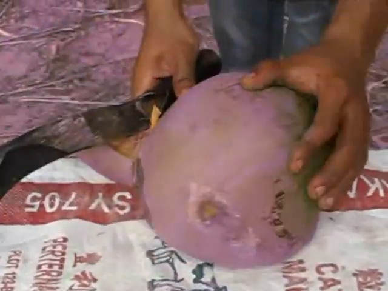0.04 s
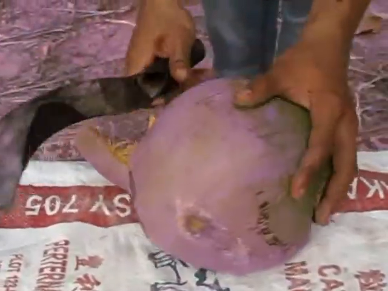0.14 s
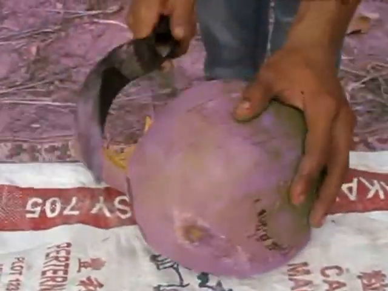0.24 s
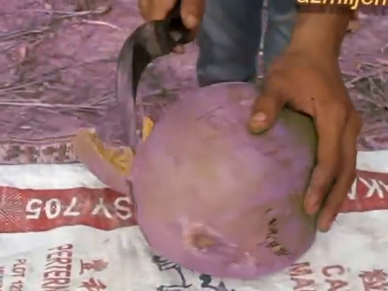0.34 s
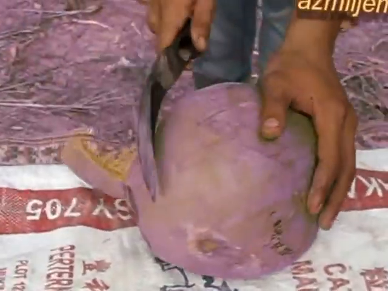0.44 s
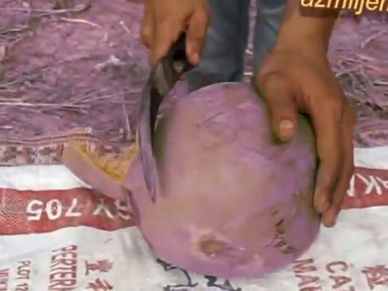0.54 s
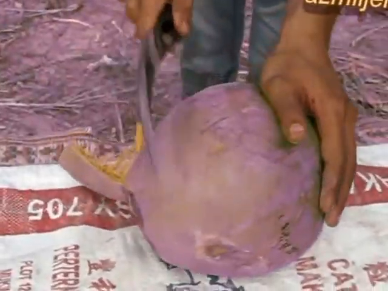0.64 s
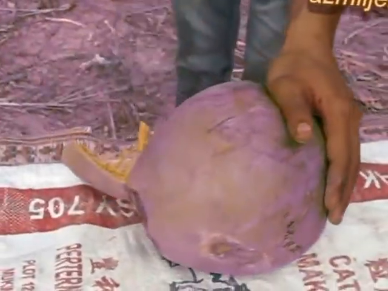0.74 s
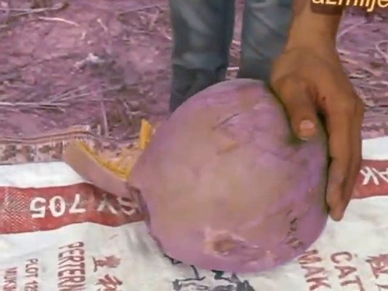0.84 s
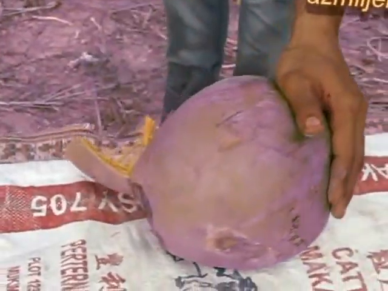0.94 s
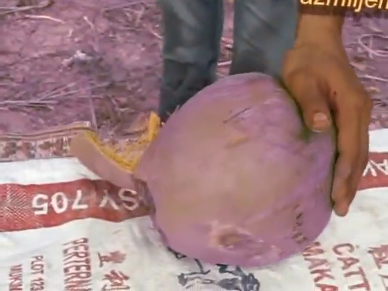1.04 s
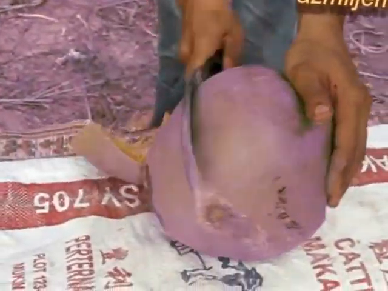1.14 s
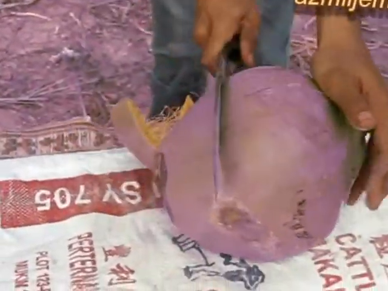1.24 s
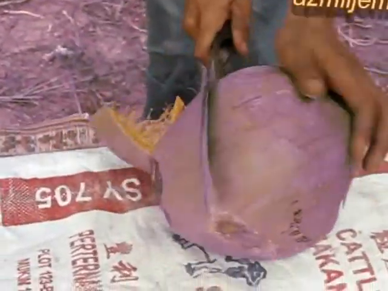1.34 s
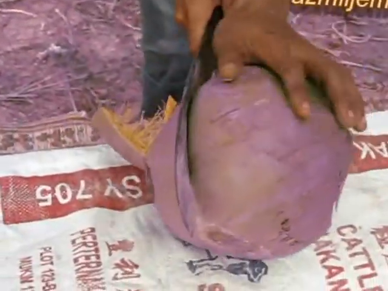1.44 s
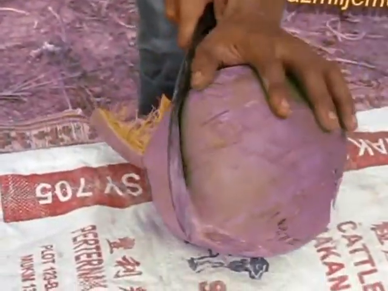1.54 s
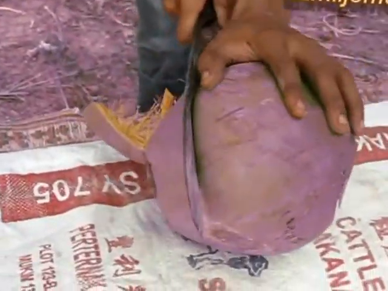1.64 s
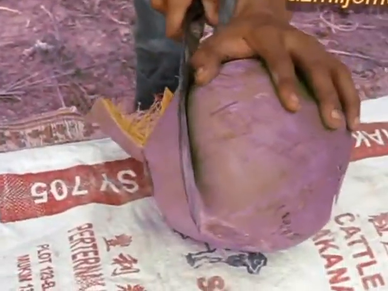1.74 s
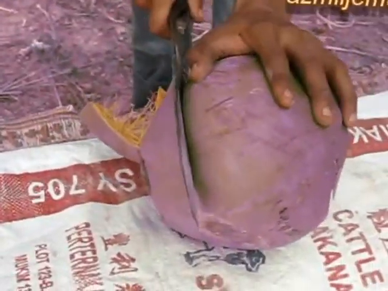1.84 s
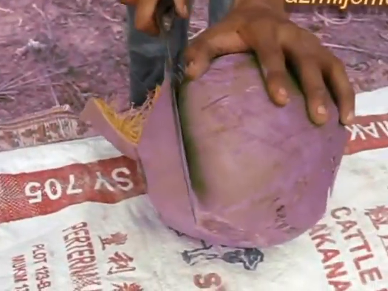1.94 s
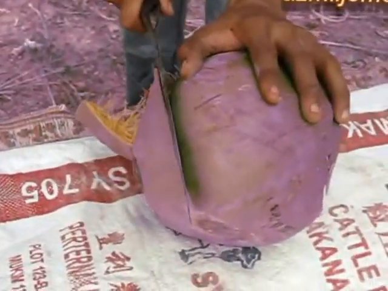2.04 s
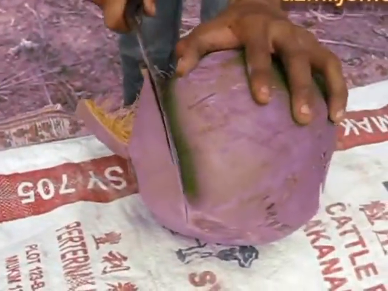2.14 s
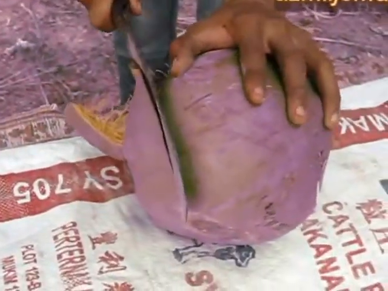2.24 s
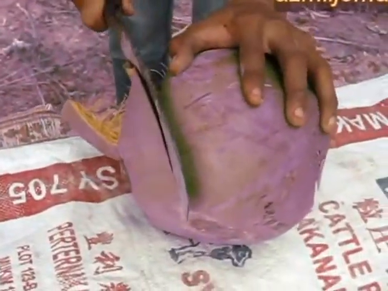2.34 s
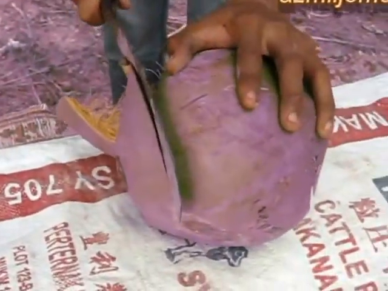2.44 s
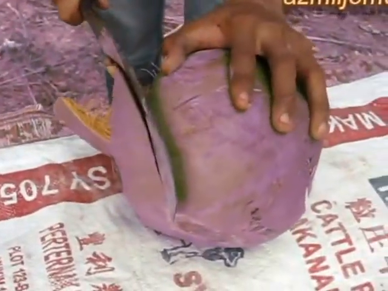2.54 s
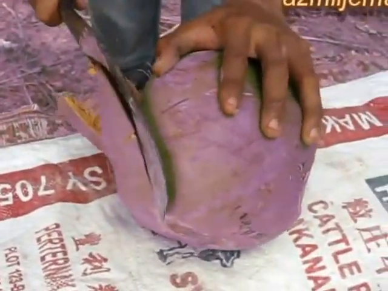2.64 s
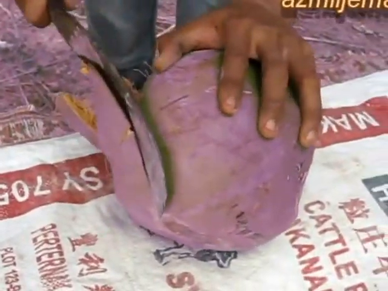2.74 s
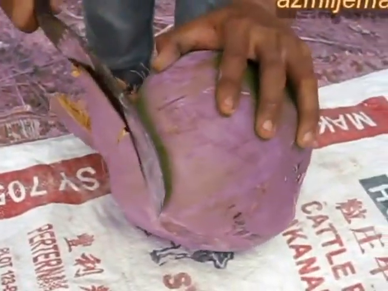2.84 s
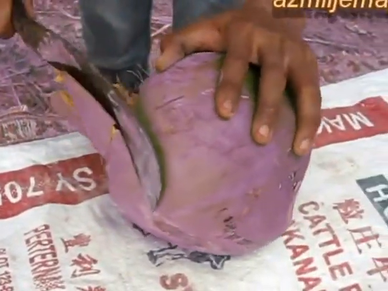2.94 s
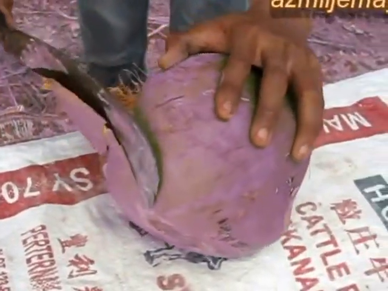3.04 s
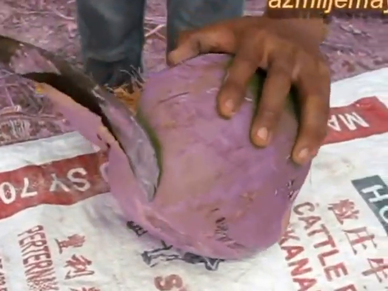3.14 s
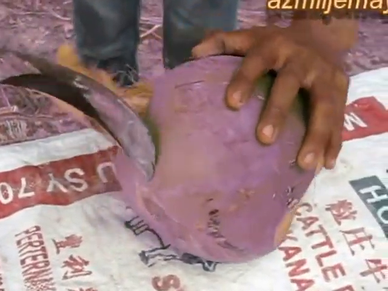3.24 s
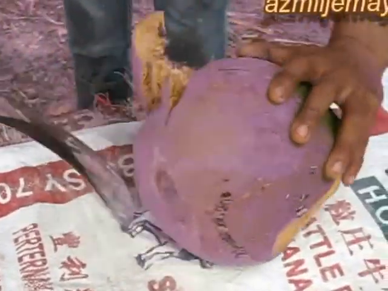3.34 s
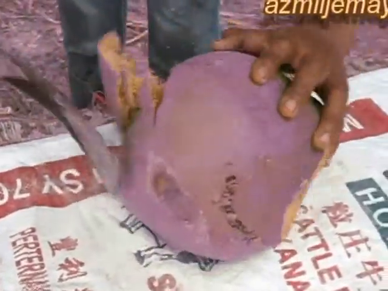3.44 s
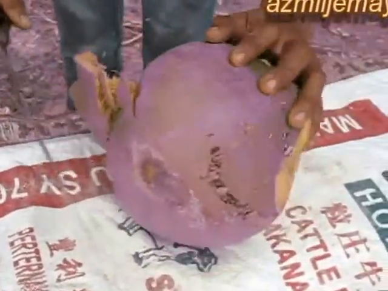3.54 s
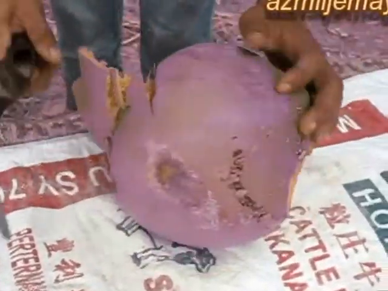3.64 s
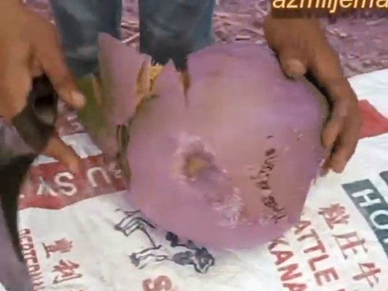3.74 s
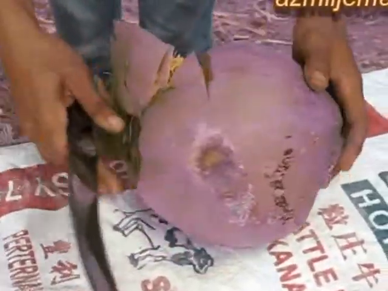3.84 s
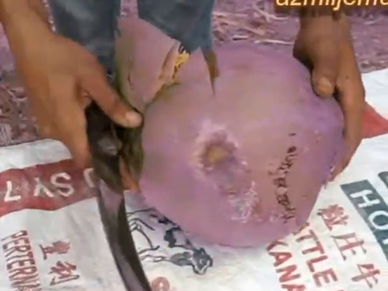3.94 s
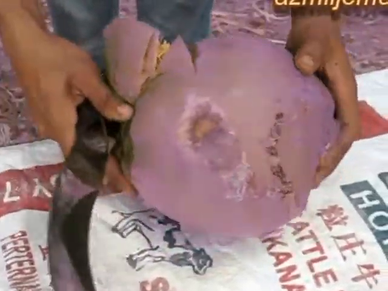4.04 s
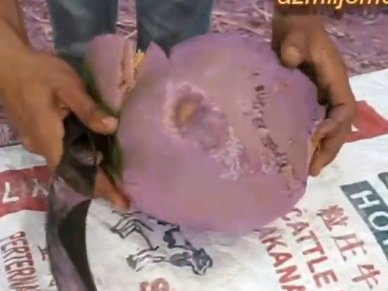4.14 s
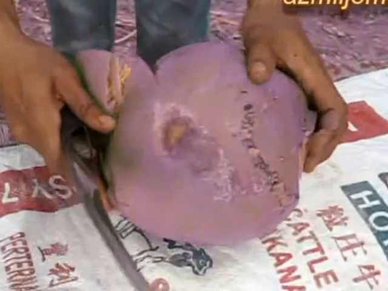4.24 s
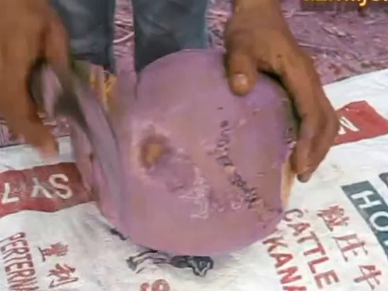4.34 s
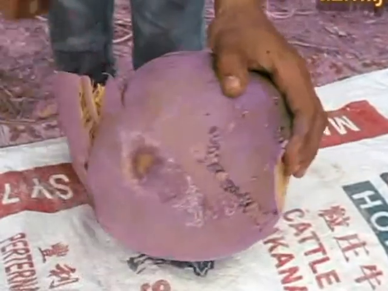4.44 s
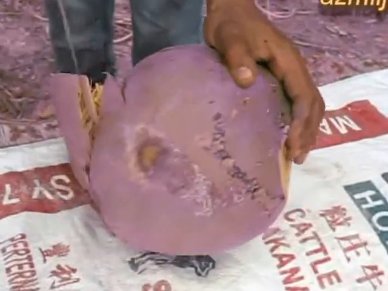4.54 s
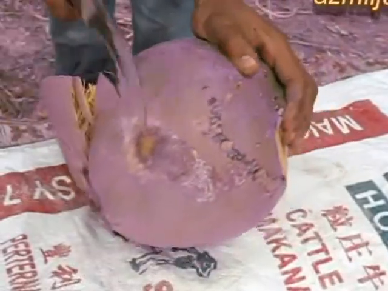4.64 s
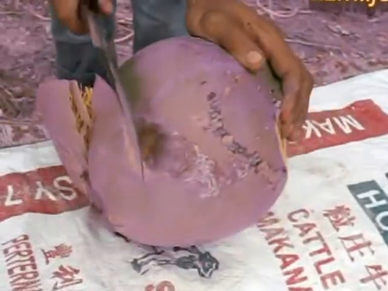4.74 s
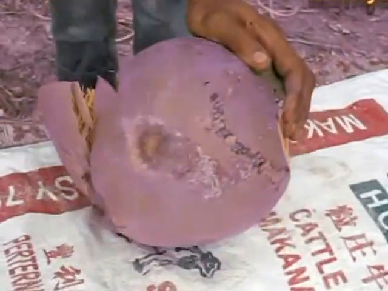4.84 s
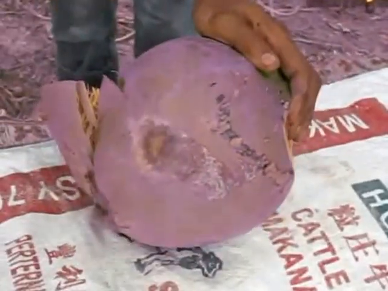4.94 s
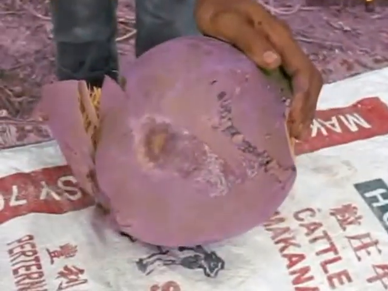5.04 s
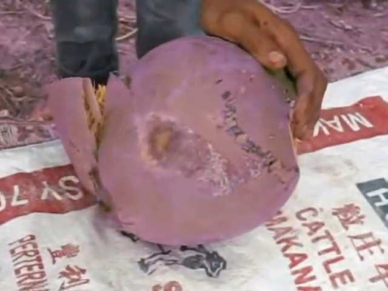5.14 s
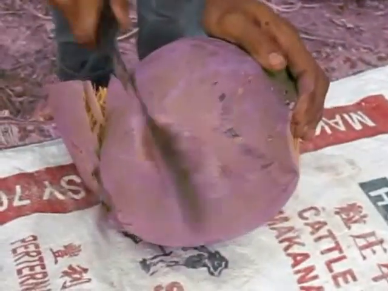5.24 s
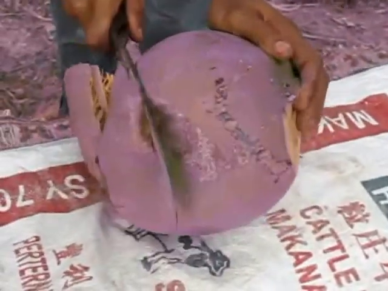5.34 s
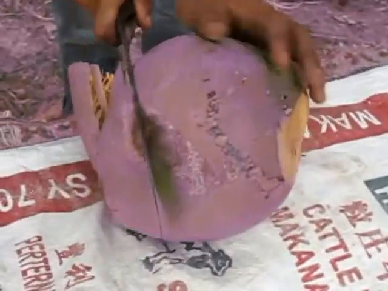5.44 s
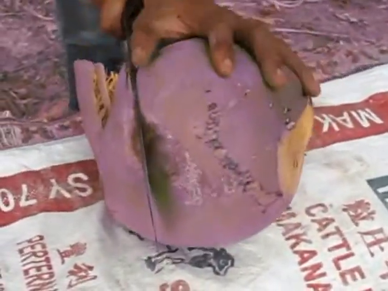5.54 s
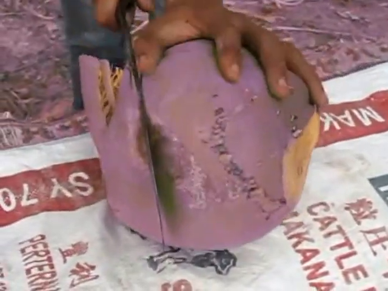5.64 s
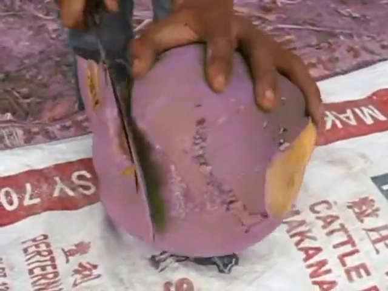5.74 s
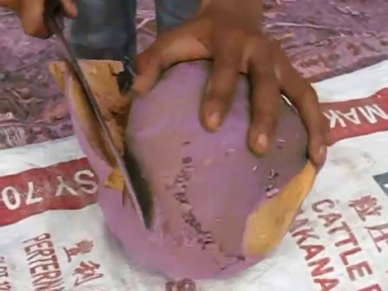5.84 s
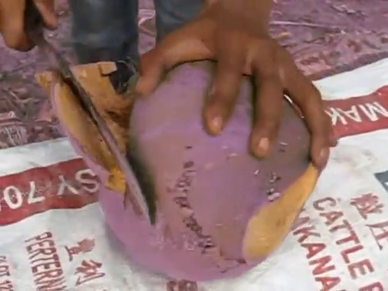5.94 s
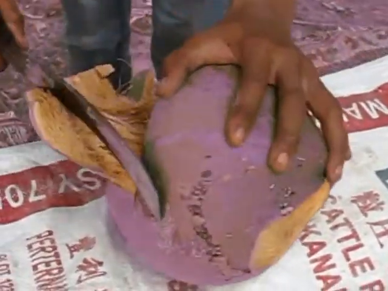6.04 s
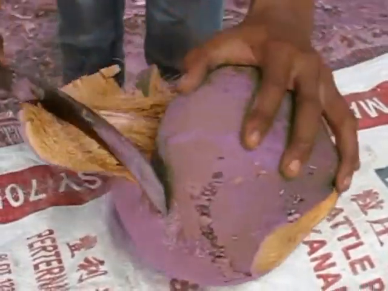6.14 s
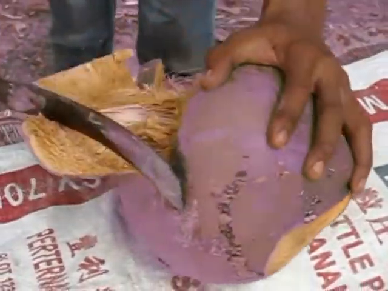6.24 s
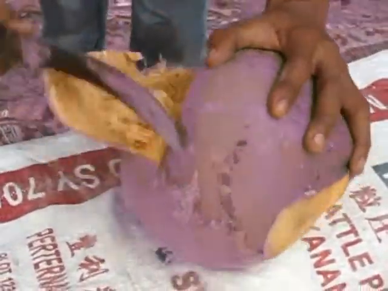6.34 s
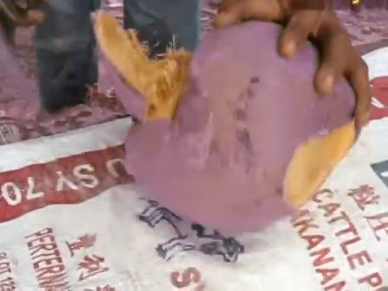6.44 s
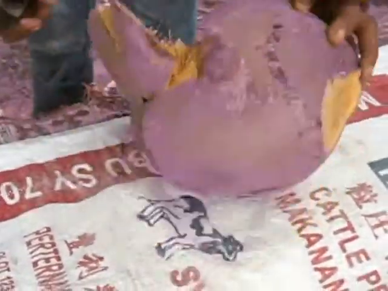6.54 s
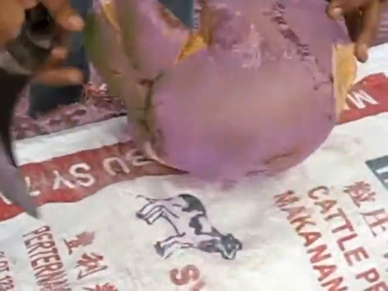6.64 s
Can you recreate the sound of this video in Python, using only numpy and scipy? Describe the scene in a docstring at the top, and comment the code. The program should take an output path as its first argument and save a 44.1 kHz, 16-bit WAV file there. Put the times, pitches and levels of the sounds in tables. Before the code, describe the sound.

Sharp hard chops into a green coconut, then rasping, crackling rips as the husk is levered loose, close up over steady high insect trills.

```python
"""Outdoors, a machete chops twice into a green coconut that lies on a woven plastic sack.
Chops knock the decaying modes of the nut, with a burst of cutting hiss and an echo from the yard.
The blade then levers the husk: clumped noise tears, clicks snap, and once a whole strip breaks loose.
Hands bump, tap and slide the nut; insects trill as narrow noise bands and chirp as short tones.
The close microphone overloads and ducks on the blows."""
import sys
import numpy as np
from scipy import signal
from scipy.fft import rfft, irfft, next_fast_len
from scipy.io import wavfile

SR = 44100
rng = np.random.default_rng(int(sys.argv[2]) if len(sys.argv) > 2 else 0)


def master(y):
    """Save y as 16-bit WAV."""
    cut = np.clip(np.atleast_2d(y).T, -1, 1)
    pcm = np.round(cut * 32767)  # scale
    wavfile.write(sys.argv[1], SR, pcm.astype(np.int16))


N = 295464
T = np.arange(N) / SR


def amp(db):
    """Decibels to gain."""
    return 10 ** (np.asarray(db) / 20)


def evened(x):
    """Scales to rms 1."""
    return x / np.sqrt(np.mean(x ** 2) + 1e-20)


def add(mix, start_s, sound):
    """Mixes a sound in at start_s, or at 0 if that is negative."""
    part = mix[max(round(start_s * SR), 0):][:len(sound)]
    part += sound[:len(part)]


def colour(x, points):
    """Causal minimum-phase filter of unit energy, shaped by (freq_hz, level_db) points."""
    hz, db = np.transpose(points)
    f = abs(np.fft.fftfreq(2048, 1 / SR))
    log_gain = np.log(amp(np.interp(np.log(f + 1), np.log(hz + 1), db)))
    min_phase = np.exp(np.conj(signal.hilbert(log_gain)))
    taps = np.fft.ifft(min_phase).real[:len(f) // 2]
    return signal.oaconvolve(x, taps / np.linalg.norm(taps))[:len(x)]


def band(x, lo_hz, hi_hz, order=2):
    """Butterworth band-pass."""
    sos = signal.butter(order, [lo_hz, min(hi_hz, SR / 2 - 1)], "band", fs=SR, output="sos")
    return signal.sosfilt(sos, x)


def resonate(x, hz, width_hz):
    """One resonance of peak gain 1."""
    return signal.lfilter(*signal.iirpeak(hz, hz / width_hz, fs=SR), x)


def drift(knots_per_s):
    """Random wander: straight lines between normal random knots."""
    knots = rng.standard_normal(4096)
    return np.interp(T * knots_per_s, np.arange(len(knots)), knots)


def crackle(per_s, spread_db):
    """Random clicks, many small and a few large, at rms 1."""
    size = amp(spread_db * np.minimum(rng.exponential(1, N), 4.5))
    sign = rng.choice([-1, 1], N)
    return evened(size * sign * (rng.random(N) < per_s / SR))


# blows and jolts of the nut: [start_s, level_db, knock_decay_s, hardness_db_per_octave,
# cutting_hiss_db, lasting_ring_db, yard_echo_db]
BLOWS = [(0.5207, -16.5, 0.0044, 0, -22, -17, -21), (1.1869, 8, 0.0017, 9, -12.5, -20, -16),
         (2.897, -23.5, .002, -6.5, -30, -32, -25), (3.398, -4.5, 0.0066, -6, -22, -6, -12),
         (4.783, -18.5, 0.0046, 0, -13, -12, -23), (5.3324, 7, 0.0025, -0.5, -11.5, -34, -17),
         (5.8417, -9.5, 0.002, -2, -18, -29, -32)]
# modes of the nut: [freq_hz, level_db, t60_s]
NUT_MODES = [(163, -14.5, 0.026), (374, -12, 0.26), (445, -13, 0.27), (634, -2.5, 0.19), (824, -10.5, 0.38),
             (1010, -0.5, 0.19), (1270, -2, 0.09), (1427, 3.5, 0.16), (1660, -2, 0.21), (2220, -0.5, 0.1),
             (2353, -5.5, 0.15), (2898, 0, 0.026), (3310, -9.5, .04), (3710, -5.5, .04)]
# fizz of fine fibres: [freq_hz, density_db_per_hz]
FIBRE_COLOUR = [(2500, -25.5), (4300, -3), (6000, 0.5), (9000, 0), (12500, -1), (15500, -12.5)]
# echo of the yard: [freq_hz, density_db_per_hz]
YARD_COLOUR = [(80, -9.5), (190, 4.5), (380, -3), (570, 3.5), (900, -1), (1500, -5), (3000, -6.5),
               (8000, -15.5), (15000, -15.5)]


def chops():
    """The blow knocks the nut's modes, the edge hisses through the husk for a few ms, the yard answers."""
    out, t = np.zeros(N), T[:SR // 2]
    for start_s, level_db, decay_s, hardness_db, hiss_db, ring_db, echo_db in BLOWS:
        knock = np.zeros(len(t))
        for k, (hz, mode_db, t60_s) in enumerate(NUT_MODES):
            # the soft husk swallows most of the motion at once; a little rings on
            dying = np.exp(-t / decay_s) + amp(ring_db - 60 * t / t60_s)
            wave = np.sin(2 * np.pi * hz * t + 0.8 * rng.standard_normal())
            knock += (-1) ** k * amp(mode_db + hardness_db * np.log2(hz)) * dying * wave
        cutting = np.interp(t, [0, .001, .0042, .0056, .04], [0.36, 1, 0.56, 0.33, 0.0074])
        hiss = colour(rng.standard_normal(len(t)), FIBRE_COLOUR) * cutting
        # strong early reflections from the ground and the legs, then a weak lumpy tail
        reflections = (amp(-60 * t / 0.23) + 0.27 * amp(-60 * t / .5)) * (1 - np.exp(-t / 0.0011))
        lumps = amp(2.4 * drift(138.6)[:len(t)])
        echo = colour(rng.standard_normal(len(t)) * lumps * reflections, YARD_COLOUR)
        blow = 1.23 * knock / abs(knock).max() + amp(hiss_db) * hiss + .5 * amp(echo_db) * echo
        add(out, start_s, amp(level_db) * blow)
    return out


# levering the husk, one curve a pull on the blade: [time_s, tearing_db]
PULLS = [
    [(1.7, -49.5), (1.735, -39), (1.81, -35), (1.86, -45.5), (1.895, -29.5), (1.93, -37), (1.96, -28.5),
     (2.03, -40.5), (2.23, -33.5), (2.285, -41.5), (2.335, -29.9), (2.43, -47)],
    [(2.47, -38.5), (2.505, -36.5), (2.6, -29.5), (2.73, -25.5), (2.82, -32), (2.888, -29)],
    [(2.9, -32), (2.96, -24.5), (3.05, -25), (3.14, -33), (3.24, -25), (3.295, -35), (3.335, -23.5),
     (3.39, -29.5), (3.42, -33)],
    [(5.7, -46), (5.77, -32), (5.82, -24), (5.87, -25), (5.935, -27), (5.965, -36)],
    [(5.965, -37.5), (6.07, -26.5), (6.14, -37.5), (6.2, -32), (6.265, -28), (6.32, -44.5)],
]
# resounding of the loosened flap, one value a pull: [flap_db]
FLAP_DB = [1.7, 3.9, 4, 1.04, 4.2]
# body of the husk: [freq_hz, density_db_per_hz]
HUSK_COLOUR = [(150, -59), (250, -10), (468, -18), (572, -9), (822, -8), (944, -1.5), (1140, -1),
               (2000, -1), (2240, -0.5), (2670, 1), (2920, 1), (4090, -4.5), (5000, -2), (6500, -37.5),
               (11000, -120)]
PULL_EDGE_S = 0.0032  # take hold, let go
STRANDS_PER_S, STRAND_DECAY_S, STRANDS_DB = 45, 0.0026, -4.5  # small strands cracking at random


def tearing():
    """Fine fibres part in clumps and fizz; thicker ones ring the nut's upper modes, damped by the hand."""
    out, t = np.zeros(N), T[:SR // 50]
    clumps = evened(amp(3.6 * drift(330) + 1.0 * drift(55)))
    coarse = crackle(2200, 1.3)
    fizz = colour(clumps * evened(coarse + 0.67 * crackle(12000, 4.0)), FIBRE_COLOUR)
    # the colour shifts as the tear moves over the nut
    cracks = np.zeros(N)
    for hz, _, _ in NUT_MODES[3:]:
        cracks += resonate(crackle(110, 3.5) * amp(3.3 * drift(24)), hz, 130)
    body = evened(colour(0.92 * clumps * coarse + 0.57 * evened(cracks), HUSK_COLOUR))
    bursts = signal.oaconvolve(abs(crackle(STRANDS_PER_S, 1.7)), np.exp(-t / STRAND_DECAY_S))[:N]
    runs = bursts * rng.standard_normal(N)
    strands = evened(colour(runs, HUSK_COLOUR) + colour(runs, FIBRE_COLOUR))
    for curve, flap_db in zip(PULLS, FLAP_DB):
        time_s, tearing_db = np.transpose(curve)
        gate = np.clip(np.minimum(T - time_s[0], time_s[-1] - T) / PULL_EDGE_S, 0, 1)
        pull = amp(np.interp(T, time_s, tearing_db)) * gate
        out += pull * (fizz + amp(flap_db - 6.5) * body + amp(STRANDS_DB) * strands)
    return out


# thick fibre bundles that snap: [start_s, level_db, dullness_db (more knock, less fizz)]
SNAPS = [(2.1632, -27, -10), (2.241, -18.5, -4.5), (2.3295, -26, -2.5), (2.3394, -21.5, -2.5),
         (2.5546, -26, -9.5), (2.735, -22.5, -8), (2.8336, -18.5, -0.5), (2.8975, -13.5, -3.5),
         (2.9847, -19, -1), (3.0121, -17, -1.5), (3.025, -17, -3), (3.0364, -16.5, -1.5),
         (3.0782, -14.5, -3), (3.117, -18.5, -4), (3.173, -22, -5), (3.191, -23, 2), (3.208, -16, 3.5),
         (3.2152, -19, 9), (3.2463, -14, 0.5), (3.2652, -17, 2), (3.3367, -23.5, 10), (3.362, -26, 10),
         (3.397, -17.5, -9), (5.774, -33, -14.5), (5.8417, -14.5, -4), (5.8486, -23, 8.5),
         (5.885, -16.5, 0.5), (5.908, -25, 6), (5.9211, -19, -1.5), (6.0184, -22, 0), (6.036, -21.5, 3),
         (6.0816, -23, -4)]
SNAP_KNOCK_DB, SNAP_FIZZ_DB = -3.5, -3.5  # against the mid-band crack, before dullness
FRAY_HALF_LENGTH_S, FRAY_DB = 0.0091, -18


def snaps():
    """A bundle frays, then gives way as a sharp click and a quick run of smaller ones."""
    out, fraying, t = np.zeros(N), np.zeros(N), T[:SR // 20]
    for start_s, level_db, dull_db in SNAPS:
        run = rng.standard_normal(len(t)) * (np.exp(-t / 0.0032) + 0.046 * np.exp(-t / 0.013))
        run[0] = 6.5  # the sharp click
        body = colour(run, HUSK_COLOUR)
        knock = amp(SNAP_KNOCK_DB + dull_db) * evened(band(body, 530, 1250))
        crack = evened(band(body, 1940, 4700))
        fizz = amp(SNAP_FIZZ_DB - dull_db) * evened(colour(run, FIBRE_COLOUR))
        add(out, start_s + .0006, amp(level_db - 12.5) * (knock + crack + fizz))
        swell = np.exp(-((T - start_s - .005) / FRAY_HALF_LENGTH_S) ** 2)
        fraying += amp(level_db - dull_db + FRAY_DB) * swell
    return out + fraying * colour(crackle(5000, 2.0), FIBRE_COLOUR)


def creak():
    """The wedged blade rasps on wet husk as the flap opens: quick slips into two overlapping resonances."""
    rubbing = np.interp(T, [6.08, 6.2, 6.27, 6.33], [0, 1, 1, 0])
    slips = crackle(720, 2.0)
    return amp(-42) * rubbing * evened(resonate(resonate(slips, 2660, 260), 2500, 260))


# light ticks of blade and fingers: [start_s, level_db, ring_hz, click_against_ring_db]
TAPS = [(.097, -28, 2760, -5), (.203, -31.5, 1530, 6.5), (1.61, -28.5, 1120, -30), (3.486, -25, 2980, 5.5),
        (3.566, -30.5, 915, 1), (3.762, -23.5, 1120, -16), (3.93, -24.5, 3200, -7), (4.151, -34, 2540, 7.5),
        (4.259, -36, 1910, 4), (5.597, -28, 1340, -5), (6.377, -14, 3100, -4)]
TAP_T60_CYCLES = 74


def taps():
    """A click and a few damped, unrelated partials for each light knock; higher ones die sooner."""
    out, t = np.zeros(N), T[:SR // 8]
    for start_s, level_db, hz, click_db in TAPS:
        dying = amp(-60 * t * hz / TAP_T60_CYCLES)
        touch = rng.standard_normal(len(t)) * dying
        ring = resonate(touch, hz, 340)
        ring += 0.1 * resonate(touch, hz * 0.91, 150) + 0.28 * resonate(touch, hz * 1.27, 220)
        click = amp(click_db) * evened(band(touch, 1050, 6500, order=1))
        knock = evened(band(ring, hz * 0.72, hz * 1.46)) + click
        add(out, start_s, amp(level_db - 4.5) * knock * np.sqrt(np.mean(dying ** 2)))
    return out


# the nut bumps on the ground: [time_s, level_db, pitch_hz]
BUMPS = [(0.482, -29, 59), (0.629, -32, 46), (0.836, -27, 77), (0.902, -30.5, 73), (1.586, -26.5, 145),
         (2.45, -36.5, 32.12), (3.086, -30.5, 105), (3.207, -33.5, 80), (4.76, -34, 70)]


def bumps():
    """The heavy nut rocks on soft ground: a short, quickly damped bass thud."""
    out, t = np.zeros(N), T[:SR // 5]
    for time_s, level_db, hz in BUMPS:
        thud = np.sin(2 * np.pi * hz * t) + 0.45 * evened(band(rng.standard_normal(len(t)), 60, 157))
        envelope = np.exp(-t / 0.012) * (1 - np.exp(-t / 0.0029))
        add(out, time_s - .004, amp(level_db + 6.0) * thud * envelope)
    return out


# hands and nut slide on the sack: [start_s, length_s, level_db, scrape_against_hiss_db]
SLIDES = [(-.04, 0.39, -42.5, 3), (0.511, 0.14, -40, -11), (1.142, 0.32, -42, 4), (1.395, 0.2, -41, -9),
          (3.447, 0.33, -47, 4), (4.18, 0.38, -51, 3), (4.53, 0.086, -29.5, -43), (4.62, 0.18, -39.5, -16),
          (5.44, 0.25, -39.5, -2.5), (6.337, 0.34, -50, 10)]
# hiss of the weave: [freq_hz, density_db_per_hz]
SACK_COLOUR = [(2000, -11), (5000, -9), (9000, 1.5), (11500, 4.5), (14000, 1.5), (16000, -10)]


def slides():
    """The plastic weave hisses under the nut; skin and blade scrape lower on the rind."""
    grain = crackle(7000, 3.0) * amp(3.0 * drift(70))
    hiss, scrape = colour(grain, SACK_COLOUR), colour(grain, HUSK_COLOUR)
    out = np.zeros(N)
    for start_s, length_s, level_db, scrape_db in SLIDES:
        stroke = np.interp((T - start_s) / length_s, [0, .05, .5, 1], [0.0071, 0.97, 0.68, 0.031])
        out += amp(level_db) * stroke * (hiss + amp(scrape_db) * scrape)
    return out


# nearer crickets: [start_s, stop_s, pitch_hz, chirps_per_s, level_db]
CRICKETS = [(0, 4.5, 9100, 3.5, -41.5), (0, 4.9, 9385, 7.5, -39.5), (.4, 6, 9600, 3, -43.5)]
CHIRP_S, CHIRP_SCATTER_HZ, CHIRP_SCATTER_DB, CHIRP_JITTER_S = 0.094, 55.7, 1, 0.035


def crickets():
    """Each cricket repeats a short fluttering chirp near its own pitch, loosely in time."""
    out, t = np.zeros(N), T[:round(CHIRP_S * SR)]
    for start_s, stop_s, hz, per_s, level_db in CRICKETS:
        chance = rng.standard_normal((100, 3))
        for s, (late, sharp, loud) in zip(np.arange(start_s, stop_s, 1 / per_s), chance):
            chirp_hz = hz + CHIRP_SCATTER_HZ * sharp
            chirp = np.sin(2 * np.pi * chirp_hz * t) * np.hanning(len(t))
            add(out, s + CHIRP_JITTER_S * late, amp(level_db + CHIRP_SCATTER_DB * loud) * chirp)
    flutter = 1 + 0.58 * evened(band(rng.standard_normal(N), 20, 106))
    return out * flutter


def blur(hz, width_hz, rms_db):
    """A far steady sound, blurred into a narrow throbbing band."""
    size = next_fast_len(N)
    f = np.fft.rfftfreq(size, 1 / SR)
    spectrum = rfft(rng.standard_normal(size)) / (1 + (2 * (f - hz) / width_hz) ** 4) ** 0.58
    voices = irfft(spectrum, size)[:N]
    throb = amp(1.2 * drift(90) + .5 * drift(2.5))
    return amp(rms_db) * evened(voices * throb)


def between(start_s, stop_s):
    """On from start to stop, with soft edges."""
    return np.clip(np.minimum(T - start_s, stop_s - T) / 0.021, 0, 1)


# chorus of far insects: [freq_hz, width_hz, rms_db]
CHORUS = [(6020, 28, -51), (6370, 1340, -46), (6700, 130, -47), (8820, 390, -48.5), (9280, 430, -49.5),
          (9480, 63, -46.5)]
# faint far tones: [start_s, stop_s, freq_hz, width_hz, level_db]
TONES = [(0.27, 2.2, 731, 42, -58), (3.4, 7.5, 2230, 61, -54)]
# trilling insects: [start_s, stop_s, freq_hz, width_hz, level_db]
TRILLS = [(-.4, 3.3, 6115, 15, -44), (-.4, 3.3, 6270, 54, -43.5), (3, 5.4, 6200, 82, -41),
          (4.5, 6.8, 6246, 50, -44)]
WING_HZ, BELOW_DB, ABOVE_DB = 592, -13, -9  # wing rate sets a side band below and above each trill


def far_sounds():
    """Narrow noise bands: faint tones, the insect chorus, single trills with two side bands."""
    out = sum(blur(*row) for row in CHORUS)
    for start_s, stop_s, hz, width_hz, level_db in TONES:
        out += between(start_s, stop_s) * blur(hz, width_hz, level_db)
    for start_s, stop_s, hz, width_hz, level_db in TRILLS:
        trill = blur(hz, width_hz, level_db)
        trill += blur(hz - WING_HZ, width_hz, level_db + BELOW_DB)
        trill += blur(hz + WING_HZ, width_hz, level_db + ABOVE_DB)
        out += between(start_s, stop_s) * trill
    return out


# outdoor hush: [freq_hz, density_db_per_hz]
AIR_COLOUR = [(25, -6.5), (140, 2.5), (270, -13.5), (380, -11), (740, -10.5), (1150, -12.5), (2000, -14),
              (2500, -12.5), (4800, -17.5), (7000, -14), (11000, -16), (15500, -21)]
HUSH_DB, RUMBLE_DB = -42.5, -55.5


def air():
    """Coloured noise as outdoor hush, with a rumble that comes and goes."""
    hush = colour(rng.standard_normal(N), AIR_COLOUR) * amp(.7 * drift(4.5))
    rumble = evened(band(rng.standard_normal(N), 36, 160)) * amp(2.7 * drift(9))
    return amp(HUSH_DB) * hush + amp(RUMBLE_DB) * rumble


def scene():
    """All sources reach one microphone; the husk sounds carry a faint echo of the yard."""
    husk = tearing() + snaps() + creak() + taps()
    t = T[:SR // 3]
    tail = colour(rng.standard_normal(len(t)), YARD_COLOUR) * amp(-60 * t / 0.15)
    echo = signal.oaconvolve(husk, tail / np.linalg.norm(tail))[:N]
    mono = chops() + husk + amp(-19) * echo + bumps() + slides() + far_sounds() + crickets() + air()
    return np.array([mono, mono])


THRESHOLD_DB, RECOVERY_DB_PER_S, EDGE_HZ = -13, 125, 15800


def record(dry):
    """Gain control ducks after a loud blow, too late to keep its start from clipping; then the band limit."""
    power = signal.lfilter(*signal.butter(1, 60, fs=SR), (dry ** 2).mean(0))
    over_db = np.maximum(10 * np.log10(abs(power) + 1e-12) - THRESHOLD_DB, 0)
    fall_db = T * RECOVERY_DB_PER_S
    held_db = np.maximum.accumulate(over_db + fall_db) - fall_db
    duck_db = signal.lfilter(*signal.butter(1, 35, fs=SR), held_db)
    ducked = dry * amp(-duck_db)
    clipped = ducked / (1 + ducked ** 8) ** (1 / 8)
    low_pass = signal.firwin(601, EDGE_HZ, window=("kaiser", 7), fs=SR)
    return signal.oaconvolve(clipped, low_pass[None], "same")


dry = scene()
out = record(dry)
master(out)
```